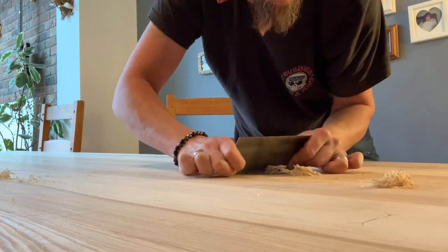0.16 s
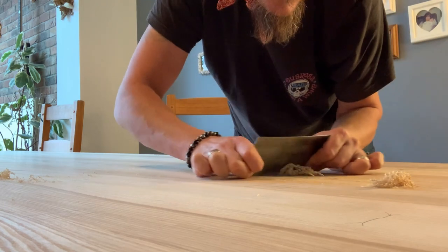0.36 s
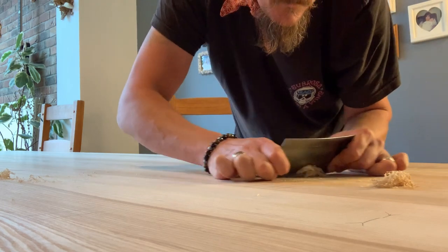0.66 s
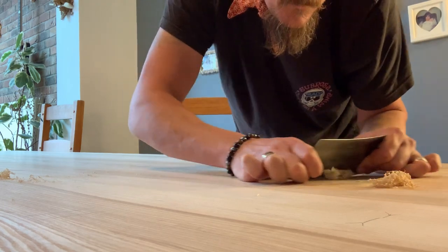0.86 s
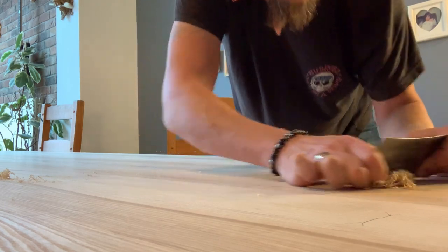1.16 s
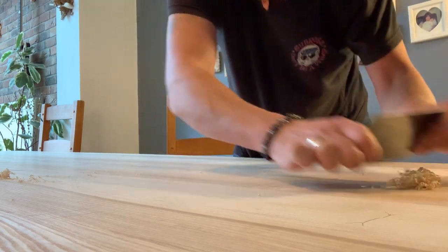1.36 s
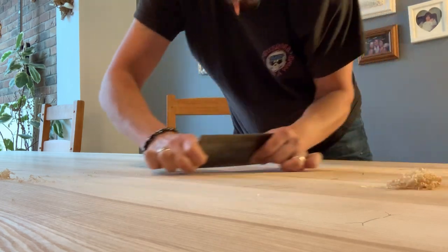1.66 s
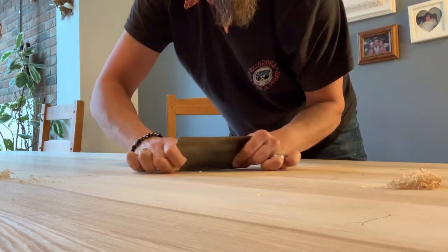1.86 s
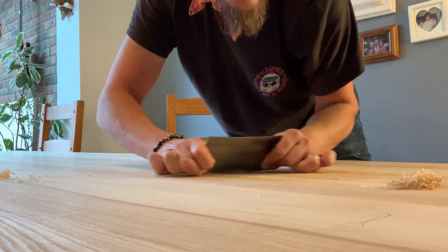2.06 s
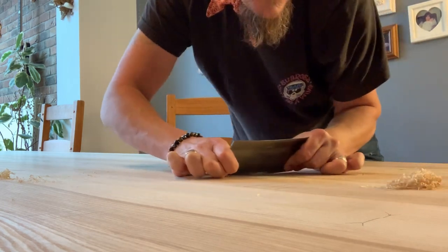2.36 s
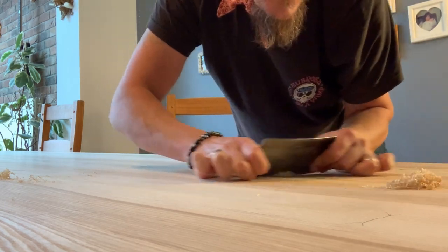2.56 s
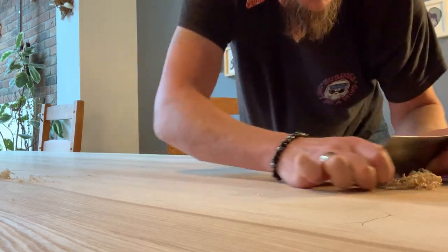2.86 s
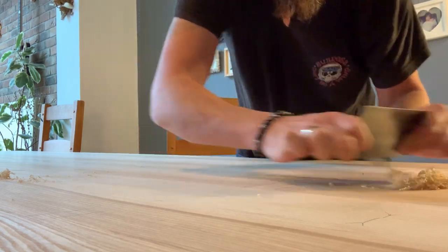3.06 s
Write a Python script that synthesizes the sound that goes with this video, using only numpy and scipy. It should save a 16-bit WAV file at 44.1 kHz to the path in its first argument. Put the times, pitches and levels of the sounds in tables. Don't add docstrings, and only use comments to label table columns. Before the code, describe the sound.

Close, dry scraping of a metal blade on wood, bright fibre hiss over low woody rasp, with brief squeaky tones; a stuttering catch, short pause, light knocks, then a second rougher pass in a quiet indoor room.

```python
import sys
import numpy as np
from scipy import signal
from scipy.fft import rfft, irfft
from scipy.io import wavfile
from scipy.ndimage import uniform_filter1d

SR = 44100
rng = np.random.default_rng(int(sys.argv[2]) if len(sys.argv) > 2 else 0)


def materialize(psi):
    bounded = np.clip(np.atleast_2d(psi).T, -1, 1)
    quanta = np.round(bounded * 32767).astype(np.int16)
    wavfile.write(sys.argv[1], SR, quanta)


def rack_gain(trim_db):
    fader = np.asarray(trim_db, float)
    return 10 ** (fader / 20)


N = 141120
T = np.arange(N) / SR

# t/s, shaving level/dB, load on the table/dB, bite of the edge/dB
SLIDES = [
    [(0.0, -64.5, -59.5, 14), (0.082, -69.5, -64, 13.5), (0.156, -71.5, -64, 13.5), (0.17, -62.5, -66, 10)],
    [(1.6, -99, -67.5, 7), (1.62, -73.5, -63, 22), (1.692, -71, -63, 12), (1.79, -79, -63, 14),
     (1.83, -92, -55.5, 10)],
]
FIRST_PASS = [
    [(0.171, -64, -56, 5), (0.176, -64, -50.5, 3), (0.186, -53.5, -47, 9), (0.26, -47.5, -41, 6.5),
     (0.378, -38.5, -40, 1.5), (0.384, -43, -36, 4), (0.452, -64, -53, -0.5), (0.51, -69, -66.5, 13.5)],
    [(0.51, -65, -57.5, -10), (0.524, -59, -48, 5.5), (0.608, -39, -42.5, 3.5), (0.71, -46.5, -40, 1.5),
     (0.798, -39, -43, 7.5), (0.864, -42.5, -45, 3), (0.974, -37, -38.5, 2.5), (1.1, -50.5, -40.5, 6)],
]
CATCH = [
    [(1.113, -45.5, -40.5, 5), (1.118, -31, -39.5, 10.5), (1.128, -28.5, -38.5, 17.5),
     (1.142, -24, -38, 0.5), (1.153, -35.5, -34.5, 7)],
    [(1.172, -37, -36.5, 7), (1.197, -28.5, -32.5, 0), (1.206, -36.5, -37.5, 9), (1.218, -24.5, -34.5, 3),
     (1.235, -32, -35, 0.5), (1.25, -40, -37, 7.5), (1.3, -52.5, -51.5, 3.5), (1.4, -73, -64.5, 13)],
]
SECOND_PASS = [
    [(1.83, -72, -55, 3), (1.846, -64.5, -53, 4), (1.88, -53.5, -59, 9), (1.952, -41.5, -45, 3),
     (2.102, -35.5, -37.5, -4), (2.13, -38.5, -39.5, 3.5), (2.166, -50, -40, 0), (2.24, -75, -77, -3)],
    [(2.262, -62, -41, -9), (2.288, -52, -42.5, -5.5), (2.348, -44, -33.5, -4.5), (2.456, -50, -37, -2),
     (2.464, -48, -34.5, -10), (2.49, -44.5, -34, -3)],
    [(2.51, -39.5, -46, 2.5), (2.528, -38.5, -36.5, 6), (2.608, -33, -38, 5.5), (2.622, -28, -31, 0.5),
     (2.656, -33, -41, -1), (2.726, -32, -38, 3), (2.92, -43, -40, 5), (3.08, -101.5, -79, -6)],
]
STROKES = SLIDES + FIRST_PASS + CATCH + SECOND_PASS
# t/s, peak level/dB, click level/dB
KNOCKS = [
    (.519, -40, 0),
    (.5315, -33, -26),
    (1.611, -55, -16),
    (1.824, -40, -14),
    (2.2503, -33, 0),
    (2.262, -30, -30),
]
# t/s, length/s, from f/Hz, to f/Hz, level/dB
SINGS = [(0.185, 0.21, 960, 1004, -40.5), (.2, 0.18, 1200, 1160, -41), (2.281, 0.13, 1036, 1048, -48),
         (2.27, 0.14, 300, 281, -39.5), (.18, 0.19, 1800, 1834, -46), (.55, 0.14, 1170, 1240, -44),
         (0.705, 0.045, 754, 775, -55), (.78, 0.18, 1450, 1520, -46), (.9, 0.11, 239, 226.5, -38),
         (0.987, 0.067, 1393, 1370, -41), (1.04, 0.095, 745, 761, -39.5), (1.113, .018, 2210, 2390, -31.5),
         (1.12, 0.025, 3280, 4630, -33), (1.195, .014, 4200, 4500, -39), (1.212, 0.017, 4000, 4380, -37),
         (1.963, 0.17, 1000, 1040, -57), (2.432, 0.091, 329, 320, -39), (2.04, 0.13, 247.5, 248, -56),
         (2.33, 0.062, 492, 450, -33), (2.38, 0.059, 260, 244, -33), (2.432, 0.032, 604, 810, -32.5),
         (2.559, 0.044, 703, 687, -42), (2.569, 0.089, 245.8, 224, -41), (2.68, 0.055, 388, 379, -40),
         (2.682, 0.046, 1418, 1400, -40.5), (2.761, 0.11, 1406, 1436, -41), (2.752, 0.21, 750, 742, -43.5)]

# f/Hz, level/dB
EDGE_HISS = [(300, -30), (1000, -12), (2600, -10), (4300, -8), (5600, -8), (8000, -3), (12000, -1),
             (15800, -1)]
# f/Hz, share/0-1
BITE_SHARE = [(1500, 0.31), (2500, 0.98), (6000, 0.47), (9000, 0.65), (12000, 0)]
# f/Hz, width/Hz, level/dB
BLADE_MODES = [(3800, 300, -15), (4300, 200, -17), (5120, 250, -16), (6300, 400, -10), (8000, 350, -2),
               (9100, 450, -3), (11300, 550, -2), (13100, 650, -4), (14900, 600, -1)]
# f/Hz, level/dB
WOOD_RASP = [(90, -75.5), (180, -14), (450, -5.5), (700, -1), (1100, -7.5), (1550, -14), (2100, -16.5),
             (5000, -50)]
# f/Hz, width/Hz, level/dB
TABLE_MODES = [(54.7, 8, 4), (95, 32.7, -14.5), (122, 41, -8), (241, 25.7, -1.5), (288.9, 6.6, -7),
               (345.7, 8.8, -9), (368.6, 6.7, -7), (803.5, 10, -7.5), (930, 49, -4), (1041, 52, -5.5),
               (1168, 13, -7.5), (1426, 40, -9.5), (1956, 64, -16.5), (599.5, 22, -15)]
# f/Hz, width/Hz, level/dB
SWISH_MODES = [(1190, 250, 0), (1570, 220, 3.5), (1830, 170, 1), (2350, 170, 4.5), (2730, 130, -10),
               (3100, 130, -25)]
# f/Hz, t60/s
ROOM_T60 = [(100, 0.83), (500, 0.61), (2000, 0.47), (6000, 0.46), (12000, 0.25)]
# f/Hz, level per Hz/dB
AIR_TONE = [(60, -14), (110, 5.5), (170, -14), (400, -8), (1000, -22.5), (3000, -33), (6000, -45),
            (9000, -47)]
# f/Hz, width/Hz, level/dB
MAINS_HUM = [
    (50, 4, -58),
    (99, 3, -56),
    (301, 4, -62),
]

# f/Hz, lead/rad
PORT_LEAD = [(250, -.2), (390, .5), (520, 3.2), (1000, 4.8), (3300, 6.), (4600, 6.), (6300, 4.7),
             (8100, 3.3), (9200, 2.9), (11700, .15), (13100, -.2), (16000, -3.1)]
# f/Hz, likeness/0-1
PORT_LIKENESS = [(60, .97), (270, .85), (450, .68), (1200, .72), (2000, .58), (6000, .55), (7000, .75),
                 (7700, .95), (9500, .93), (10300, .78), (12500, .93)]
# f/Hz, level/dB
PORT_BALANCE = [(60, -4), (180, -5), (550, -1.5), (1650, 0.5), (4970, 0.5), (15000, 0.0)]
# from t/s, to t/s, low f/Hz, high f/Hz
PORT_NULLS = [(1.125, 1.225, 4700, 5150), (1.135, 1.215, 6500, 8500), (1.195, 1.235, 3250, 3550),
              (1.9, 1.985, 5500, 6250), (1.87, 2.055, 4400, 4600), (2.0, 2.1, 6500, 8500),
              (2.03, 2.055, 5500, 5800), (2.755, 2.92, 6350, 8500), (2.825, 2.87, 5400, 5800),
              (2.83, 2.94, 4350, 4600), (.86, .9, 5700, 6000), (.99, 1.02, 5900, 6150),
              (.6, .68, 4600, 4800), (2.33, 2.43, 5750, 5950), (.32, .42, 5500, 5650),
              (.58, .67, 5550, 5700), (2.1, 2.13, 7000, 8500)]

SNAPS_PER_S, SNAP_SPREAD_DB = 25000, 1.1
CHATTER_HZ, CHATTER_WIDTH_HZ, CHATTER_DB = 185, 30, 0.8
CATCH_CHATTER_DB, CATCH_LEVEL_DB, CATCH_SLOPE_DB = 3.5, -33, 1.5
WANDER_DB, PATCH_DB, WOOD_BITE = 0.8, 1.6, 1
EDGE_DB, TABLE_DB, WOOD_DB = 1.5, 1.5, -2.5
BLADE_DB = -1
LIFT_GAP_S, CLICK_S, PUSH_RISE_S, PUSH_FALL_S = 0.021, 0.0013, 0.0012, 0.0012
SING_WIDTH, SING_SKEW = 0.043, 0.8
SWISH_S, SWISH_RISE_S, SWISH_HOLD_S = 1.636, 0.044, 0.045
SWISH_FALL_DB_PER_S, SWISH_DB = 168, -44.5
ROOM_DB, AIR_DB = -13.5, -54
BASS_CUT_HZ, TOP_CUT_HZ = 40, 15900
NULL_SAME, NULL_PAD_S, NULL_PAD_HZ = 0.998, 0.016, 70


def scrape():
    level_db, bite_db = control(column=1), control(column=3)
    catching = CATCH_CHATTER_DB / (6.5 + np.exp((CATCH_LEVEL_DB - level_db) / CATCH_SLOPE_DB))
    chatter_db = (CHATTER_DB + catching) * np.tanh(drift(CHATTER_WIDTH_HZ, CHATTER_HZ))
    touch = contact()
    force = touch * rack_gain(level_db + chatter_db + WANDER_DB * drift(21))
    edge = snaps()
    hiss = evened(colour(edge, lambda f: rack_gain(read(EDGE_HISS, f))))
    steel = rack_gain(EDGE_DB) * (hiss + rack_gain(BLADE_DB) * evened(ring(edge, BLADE_MODES)))

    push = snaps()
    load = touch * rack_gain(control(column=2) + WANDER_DB * drift(52))
    steady_rms = np.sqrt(np.mean(ring(push, TABLE_MODES) ** 2))
    table = ring(push * load, TABLE_MODES) / steady_rms
    rasp = load * evened(colour(push, lambda f: rack_gain(read(WOOD_RASP, f))))
    wood = rack_gain(TABLE_DB) * table + rack_gain(WOOD_DB) * rasp
    return force * patchy(steel, bite_db) + patchy(wood, WOOD_BITE * bite_db)


def control(column):
    rows = np.concatenate([np.array(s) for s in STROKES])
    rows = rows[np.argsort(rows[:, 0])]
    return uniform_filter1d(np.interp(T, rows[:, 0], rows[:, column]), size=180)


def contact():
    on = sum((T >= s[0][0]) & (T <= s[-1][0] + LIFT_GAP_S) for s in STROKES)
    return uniform_filter1d(np.minimum(on, 1.), size=200)


def snaps():
    size = rack_gain(SNAP_SPREAD_DB * np.minimum(rng.exponential(1, (2, N)), 5))
    kick = size * rng.standard_normal((2, N))
    fires = rng.random((2, N)) < SNAPS_PER_S / SR
    return evened(kick * fires)


def patchy(x, bite_db):
    hz, t, z = signal.stft(x, SR, nperseg=256, noverlap=192)
    patches = uniform_filter1d(rng.standard_normal(z.shape[1:]), size=4, axis=0)
    patches = evened(uniform_filter1d(patches, size=40, axis=1))
    tilt_db = read(BITE_SHARE, hz)[:, None] * np.interp(t, T, bite_db)
    z = z * rack_gain(PATCH_DB * patches + tilt_db)
    return signal.istft(z, SR, nperseg=256, noverlap=192)[1][:, :N]


def sings():
    out = np.zeros((2, N))
    drive = rng.standard_normal((2, N)) + 1j * rng.standard_normal((2, N))
    for s, length, from_hz, to_hz, db in SINGS:
        at = round(s * SR)
        u = np.arange(0, 1, 1 / (length * SR))
        r = np.exp(-np.pi * SING_WIDTH * from_hz / SR)
        slow = signal.lfilter([1], [1, -2 * r, r * r], drive[:, at - 2000:at + len(u)])[:, 2000:]
        glide_hz = from_hz + (to_hz - from_hz) * u
        tone = (slow * np.exp(2j * np.pi * np.cumsum(glide_hz) / SR)).real
        hump = np.sin(np.pi * u ** SING_SKEW)
        out[:, at:at + len(u)] += rack_gain(db) * hump * [evened(v) for v in tone]
    return out


def knocks():
    out, t = np.zeros((2, N)), T[:9000]
    push = np.exp(-t / PUSH_FALL_S) * (1 - np.exp(-t / PUSH_RISE_S)) ** 2
    thud = ring(push, [(hz, width + 12, db) for hz, width, db in TABLE_MODES[3:12]])
    thud = thud / abs(thud).max()
    for s, db, click_db in KNOCKS:
        click = rng.standard_normal((2, len(t))) * np.exp(-t / CLICK_S)
        at = round(s * SR)
        out[:, at:at + len(t)] += rack_gain(db) * (thud + rack_gain(click_db) * click)
    return out


def swish():
    u = T - SWISH_S
    fall_s = np.maximum(u - SWISH_RISE_S - SWISH_HOLD_S, 0)
    shape = np.clip(u / SWISH_RISE_S, 0, 1) ** 2 * rack_gain(-SWISH_FALL_DB_PER_S * fall_s)
    return rack_gain(SWISH_DB + 2 * WANDER_DB * drift(30)) * shape * evened(ring(snaps(), SWISH_MODES))


def room(x):
    sign = rng.choice([-1., 1.], (2, SR))
    hits = rng.random((2, SR)) < 2500 / SR
    taps = sign * hits * (T[:SR] > .006)
    hz, t, z = signal.stft(taps, SR, nperseg=256)
    t60 = np.maximum(read(ROOM_T60, hz), .05)[:, None]
    tail = signal.istft(z * rack_gain(-60 * t / t60), SR, nperseg=256)[1]
    return signal.fftconvolve(x, tail / np.linalg.norm(tail[0]), axes=1)[:, :N]


def air():
    noise = rng.standard_normal((2, N))
    out = rack_gain(AIR_DB) * evened(colour(noise, lambda f: rack_gain(read(AIR_TONE, f)) * (f > 30)))
    for hz, width, db in MAINS_HUM:
        out = out + rack_gain(db) * evened(ring(rng.standard_normal((2, N)), [(hz, width, 0)]))
    return out


def evened(x):
    return x / np.sqrt(np.mean(x ** 2) + 1e-20)


def read(points, hz):
    f, value = np.transpose(points)
    return np.interp(np.log(hz + 1), np.log(f + 1), value)


def colour(x, gain):
    return irfft(rfft(x) * gain(np.fft.rfftfreq(N, 1 / SR)), N)


def ring(x, modes):
    out = 0
    for hz, width, db in modes:
        r = np.exp(-np.pi * width / SR)
        poles = [1, -2 * r * np.cos(2 * np.pi * hz / SR), r * r]
        out = out + rack_gain(db) * np.sqrt(1 - r) * signal.lfilter([1, 0, -1], poles, x)
    return out


def drift(top_hz, centre_hz=0):
    return evened(colour(rng.standard_normal(N), lambda f: 1 / (1 + ((f - centre_hz) / top_hz) ** 2)))


def scene():
    near = scrape() + knocks()
    background = air()
    near = near + sings() + swish()
    return near + rack_gain(ROOM_DB) * room(near) + background


def band_limit(x):
    return signal.sosfilt(signal.butter(12, 16470, fs=SR, output="sos"), x)


def record(dry):
    dry = colour(dry, lambda f: 1 / (1 + (BASS_CUT_HZ / (f + 1)) ** 6) / (1 + (f / TOP_CUT_HZ) ** 200))
    hz, t, (a, b) = signal.stft(dry, SR, nperseg=1024, noverlap=768)
    same = read(PORT_LIKENESS, hz)[:, None]
    lead = read(PORT_LEAD, hz)[:, None]
    tilt = rack_gain(read(PORT_BALANCE, hz) / 2)[:, None]
    null = np.zeros(a.shape, bool)
    for t0, t1, low, high in PORT_NULLS:
        band = (hz > low - NULL_PAD_HZ) & (hz < high + NULL_PAD_HZ)
        null |= np.outer(band, (t > t0 - NULL_PAD_S) & (t < t1 + NULL_PAD_S))
    same = np.where(null, NULL_SAME, same)
    lead = np.where(null, np.pi, lead)
    tilt = np.where(null, 1, tilt)
    left = a * tilt
    right = (same * a * np.exp(-1j * lead) + np.sqrt(1 - same ** 2) * b) / tilt
    ports = signal.istft(np.array([left, right]), SR, nperseg=1024, noverlap=768)[1][:, :N]
    return band_limit(ports)


dry = scene()
out = record(dry)
materialize(out)
```